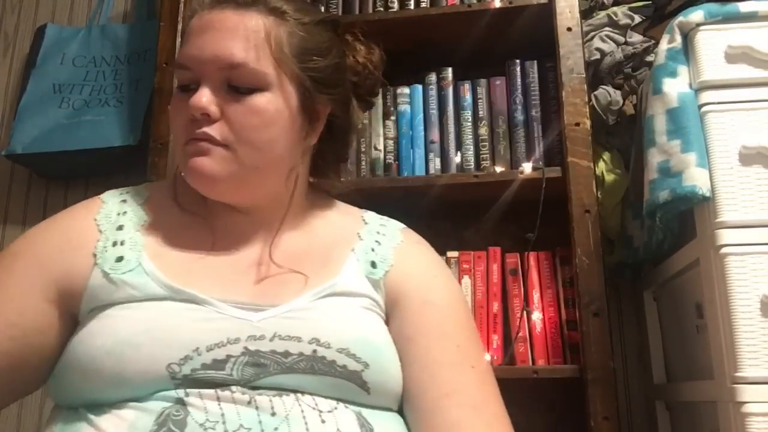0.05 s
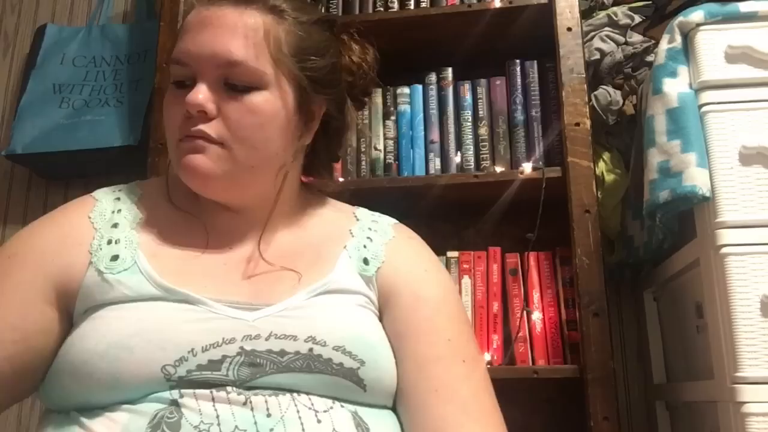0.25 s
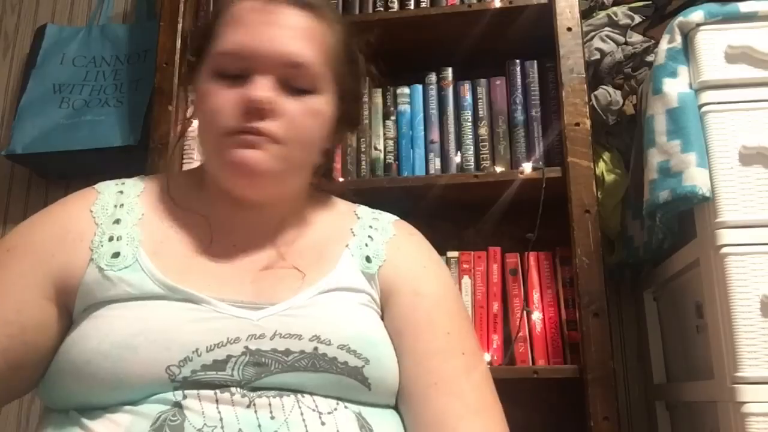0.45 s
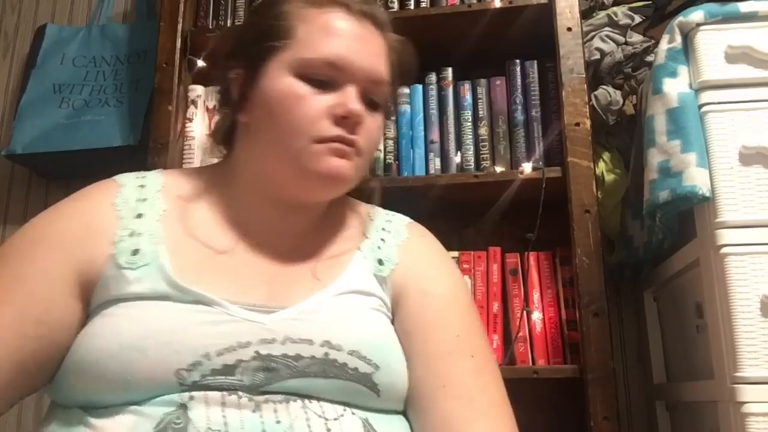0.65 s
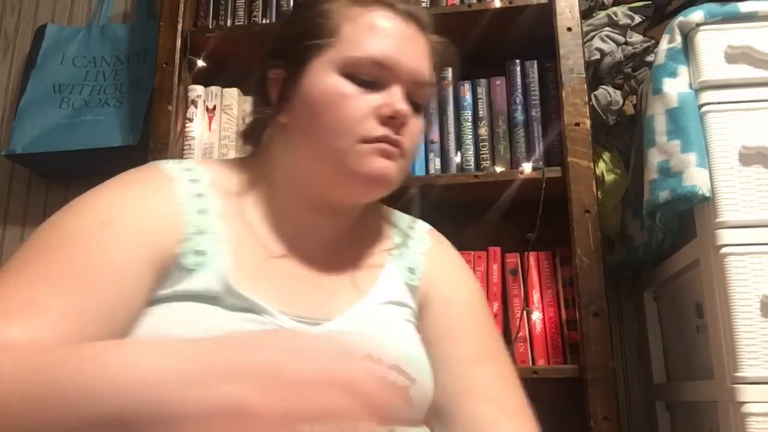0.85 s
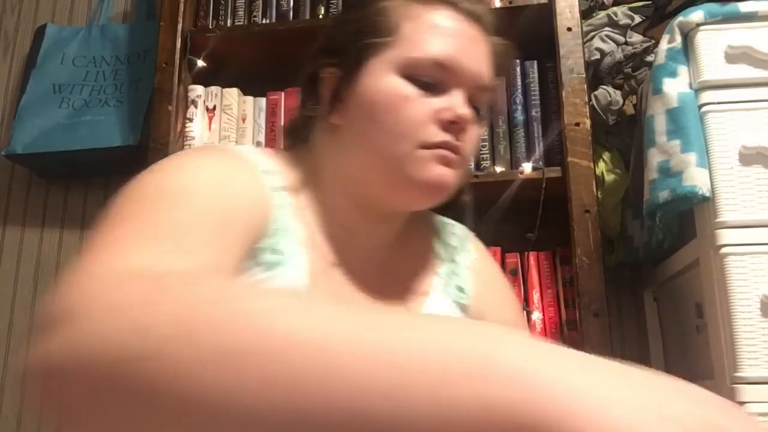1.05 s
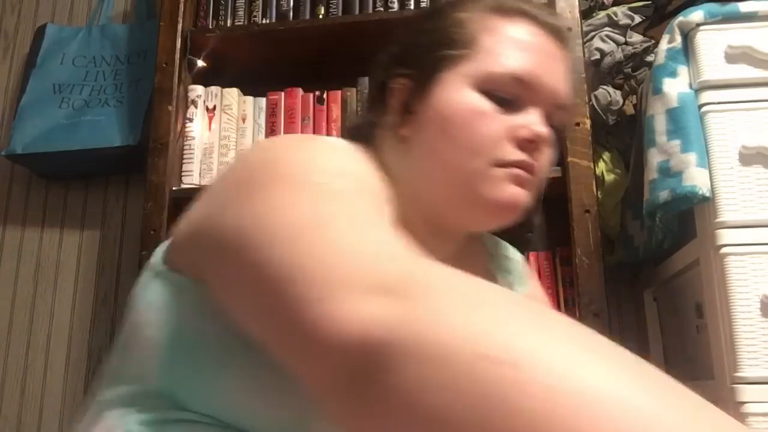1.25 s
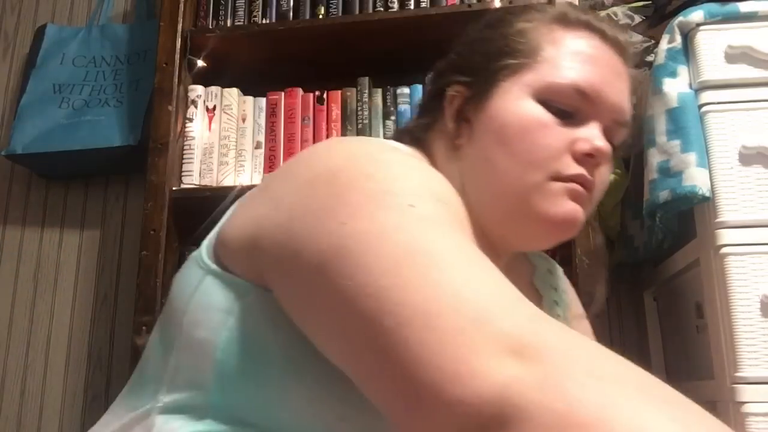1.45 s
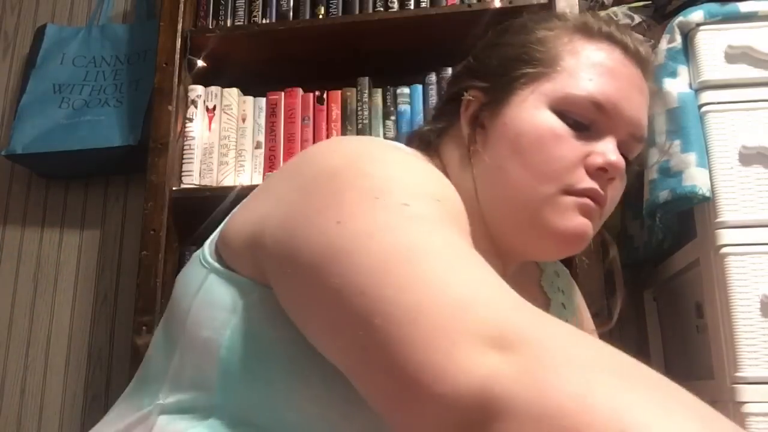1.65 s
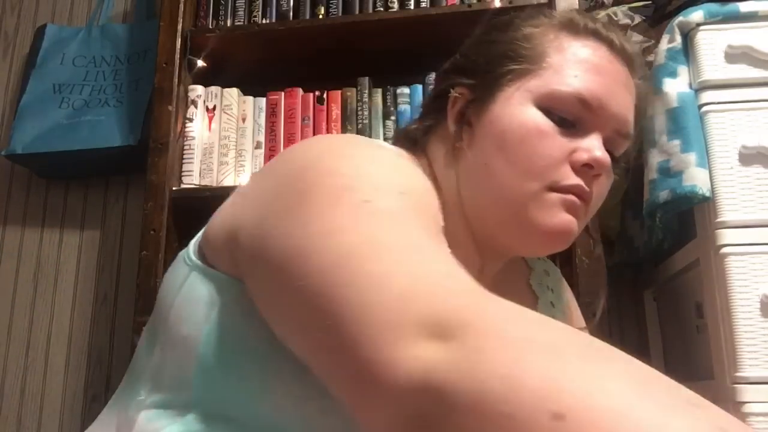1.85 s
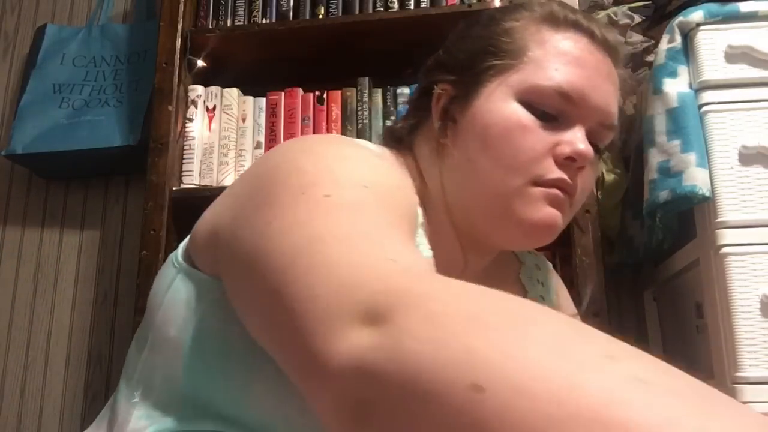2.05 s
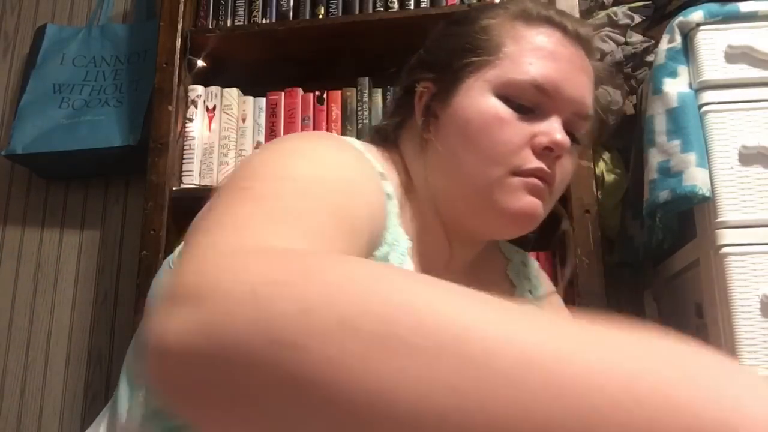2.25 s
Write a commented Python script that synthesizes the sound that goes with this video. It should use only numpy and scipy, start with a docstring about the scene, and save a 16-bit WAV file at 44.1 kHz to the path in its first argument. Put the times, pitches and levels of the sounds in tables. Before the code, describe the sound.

A hard object thumps down on a wooden table, close to the microphone. Clothing swishes faintly, then something slides across the top in two rasping strokes with small knocks and a final shove, in a small, quiet room.

```python
"""Set down and slid on a wooden table

A hard object touches, tips and lands with a boom, close up: its weight rings the table top, its edges knock.
Clothing swishes as an arm reaches across. Something slides over the top in two strokes of hissing,
rasping friction, bumps, knocks and is shoved home. The room is small and quiet, with a faint mains hum."""
import sys
import numpy as np
from scipy import signal
from scipy.fft import rfft, irfft
from scipy.io import wavfile

SR = 44100
rng = np.random.default_rng(int(sys.argv[2]) if len(sys.argv) > 2 else 0)


def bounce(signal):
    """Save signal as a 16-bit WAV file at the path given by the first command-line argument."""
    frames = np.transpose(np.atleast_2d(signal))
    limited = np.clip(frames, -1, 1)
    pcm = np.round(limited * 32767).astype(np.int16)
    wavfile.write(sys.argv[1], SR, pcm)


N = 105840
TIME = np.arange(N) / SR


def from_db(db):
    return 10 ** (np.asarray(db) / 20)


def rms_one(x):
    return x / np.sqrt(np.mean(x ** 2) + 1e-20)


def gains(rows):
    """One fader curve per dB column; a curve that starts late or ends early is silent beyond its rows."""
    times, *columns = np.transpose(rows)
    before_db = -120 if times[0] > .5 else None
    after_db = -120 if times[-1] < TIME[-1] - .05 else None
    return [from_db(np.interp(TIME, times, db, left=before_db, right=after_db)) for db in columns]


def at_hz(points, hz):
    """Reads a curve on a log-frequency axis."""
    freqs, values = np.transpose(points)
    return np.interp(np.log(hz + 1e-9), np.log(freqs), values)


def coloured(x, spectrum):
    """Shapes a steady signal with an EQ curve and brings it to rms 1."""
    eq = from_db(at_hz(spectrum, np.fft.rfftfreq(N, 1 / SR)))
    return rms_one(irfft(rfft(x) * eq, N))


def noise(spectrum):
    return coloured(rng.standard_normal(N), spectrum)


def filtered(x, hz, kind, order=2):
    sos = signal.butter(order, np.clip(hz, 10, .48 * SR), kind, fs=SR, output="sos")
    return signal.sosfilt(sos, x)


def peaked(x, peaks):
    """Adds resonances or notches."""
    for hz, db, q in peaks:
        x = x + (from_db(db) - 1) * signal.lfilter(*signal.iirpeak(hz, q, fs=SR), x)
    return x


def decay(start, t60):
    """Sudden start, exponential fall."""
    return (TIME >= start) * from_db(-60 * np.maximum(TIME - start, 0) / t60)


def ringing(modes):
    """Half a second of struck modes, each a dying sine."""
    t = TIME[:SR // 2]
    return sum(from_db(db - 60 * t / t60) * np.sin(2 * np.pi * hz * t) for hz, db, t60 in modes)


def placed(x, start):
    """Lays a sound on the timeline, `start` seconds in."""
    return np.concatenate([np.zeros(max(int(start * SR), 0)), x, np.zeros(N)])[:N]


def room():
    """Room tone: low rumble, faint hiss and a wavering mains hum."""
    # Each row: frequency in Hz, relative level in dB.
    air_colour = [(20, -25), (55, -1), (100, -16), (200, -15), (500, -21.5), (1500, -25), (4000, -31),
                  (9000, -37), (16000, -43)]
    # Each row of both: time in seconds, level in dB.
    air_level = [(0, -53), (.07, -54.5), (.2, -50), (.45, -53.5), (.7, -54.5), (.78, -55), (.9, -53.5),
                 (2.4, -53)]
    hum_level = [(0, -42.5), (.13, -64), (.3, -38), (.48, -45), (.68, -51), (.78, -64.5), (.86, -47),
                 (1.24, -45), (1.38, -62), (1.55, -41), (1.85, -47), (1.99, -52), (2.22, -48), (2.4, -43.5)]
    hum_hz = 119.6
    hum = np.sqrt(2) * np.sin(2 * np.pi * hum_hz * TIME)
    return gains(air_level)[0] * noise(air_colour) + gains(hum_level)[0] * hum


def thuds():
    """Weight lands on the table top and rings its modes, most of all those near the blow's own pitch."""
    # Each row: frequency in Hz, relative level in dB, time to fall 60 dB in seconds.
    table_modes = [(52.4, -4, 0.44), (77, 5.5, 0.15), (117.3, 8.5, 0.072), (153.4, -6, 0.28),
                   (200, 8.5, 0.081), (232, -5.5, 0.14), (315, -6, 0.14), (411.7, -2.5, 0.049),
                   (486, -1, 0.028), (601, -1, 0.042), (898, -4.5, 0.068)]
    # Each row: start in seconds, level in dB, most excited pitch in Hz.
    blows = [(.002, -37.5, 70.4), (0.018, -41, 318), (0.182, -40, 370), (0.2162, -5.5, 382),
             (.225, -14.5, 142), (0.2486, -7.5, 196), (0.2508, -3, 76), (.397, -30.5, 85),
             (1.336, -44, 71.5), (1.6005, -19.5, 700), (1.605, -23.5, 225), (1.61, -14.5, 410),
             (1.614, -18, 74), (1.675, -21.5, 56), (1.805, -26, 59), (1.86, -28, 454), (2.02, -16.5, 600),
             (2.022, -28, 235), (2.028, -31.5, 76), (2.093, -14, 820), (2.108, -11.5, 119.3),
             (2.177, -24, 123), (2.179, -21, 408), (2.204, -24.5, 49), (2.356, -38.5, 756),
             (2.377, -42, 523)]
    swell_cycles, focus_db_per_octave = 0.37, 18.5
    out, t = np.zeros(N), TIME[:SR // 2]
    for start, db, focus_hz in blows:
        for hz, mode_db, t60 in table_modes:
            level_db = db + mode_db - focus_db_per_octave * abs(np.log2(hz / focus_hz))
            swell = 1 - np.exp(-(t * hz / swell_cycles) ** 2)  # low modes bloom more slowly
            out += placed(swell * ringing([(hz, level_db, t60)]), start)
    return out


def friction(spectrum):
    """Surface grains catch and let go thousands of times a second, under a juddering pressure."""
    grains_per_s, grain_spread_db = 9000, 1.5
    judder_hz, judder_db = 200, 1.15
    caught = rng.random(N) < grains_per_s / SR
    sizes = from_db(grain_spread_db * np.minimum(rng.exponential(1, N), 4))
    grains = caught * sizes * rng.choice([-1, 1], N)
    judder = rms_one(filtered(rng.standard_normal(N), judder_hz, "low"))
    return coloured(grains, spectrum) * from_db(judder_db * judder)


def clothes():
    """Cloth rubs in soft swishes that swell and fade with the arm's speed."""
    # Each row: start, peak and end in seconds, level in dB, low-pass in Hz.
    # The first swish cuts off just short of its peak.
    swishes = [(0.094, 0.178, 0.17, -52.5, 9000), (0.807, 0.908, 1.1, -51.5, 16000),
               (0.857, 1.058, 1.41, -52, 9000)]
    # Each row: frequency in Hz, relative level in dB.
    cloth_colour = [(200, -15), (800, -10), (2000, -5.5), (3600, -4), (7000, -8), (10000, -10.5),
                    (16000, -10.5)]
    rubbing, out = friction(cloth_colour), np.zeros(N)
    for start, peak, end, db, dull_hz in swishes:
        speed = np.interp(TIME, [start, peak, end], [0, 1, 0])
        out += from_db(db) * speed * filtered(rubbing, dull_hz, "low")
    return out


def knocks():
    """Hard edges meet with a short crunch and a ping; then object and room ring, dying band by band."""
    # Each row: start in seconds, level in dB, low-pass in Hz, contact length in seconds,
    # relative ring level in dB, ping pitch in Hz, relative ping level in dB.
    hits = [(0.212, -35.5, 8900, .003, -2, 3400, -7), (0.2262, -19.5, 1890, 0.0055, -11, 1690, -19),
            (0.2462, -8.5, 8700, 0.00448, -8.5, 2110, -5), (0.2597, -22, 13000, 0.0048, -15, 1400, -8),
            (1.5992, -29.5, 9100, 0.012, -21, 1140, 3.5), (2.006, -33, 1980, 0.0069, -2.5, 946, 9),
            (2.02, -22, 5000, 0.0071, -13.5, 6370, -2), (2.0904, -19.5, 10800, .004, -11, 4100, 1),
            (2.375, -43, 2460, 0.0073, -12, 970, 4.5), (2.389, -37, 3020, 0.0047, -22, 1960, 0)]
    # Tone of the crunch and its noisy tail. Each row: frequency in Hz, relative level in dB.
    knock_colour = [(100, -6), (300, 12.5), (900, 3), (2400, 2.5), (2900, -3), (4200, -3), (6000, -4),
                    (9000, -10.5), (16000, -11)]
    # Each row: frequency in Hz, time for the tail to fall 60 dB in seconds.
    tail_t60 = [(200, 0.12), (1000, 0.17), (4000, 0.17), (14000, 0.12)]
    # Each row: frequency in Hz, relative level in dB, time to fall 60 dB in seconds.
    object_modes = [(654, -7, 0.12), (954, -14, .22), (1079, -8.5, 0.14), (1405, -9.5, 0.081),
                    (1545, -11.5, 0.2), (1718, -4, 0.1), (2062, -14.5, 0.22), (2355, -19, 0.18),
                    (2520, -9, 0.166), (3365, -14, .13)]
    ring_delay_s, ping_t60_s = 0.00136, 0.024
    crunch, wash, out = noise(knock_colour), noise(knock_colour), np.zeros(N)
    edges_hz = np.geomspace(120, 17000, 8)
    bands = [(filtered(wash, [lo, hi], "band"), at_hz(tail_t60, np.sqrt(lo * hi)))
             for lo, hi in zip(edges_hz, edges_hz[1:])]
    for start, db, dull_hz, length, ring_db, ping_hz, ping_db in hits:
        contact = crunch * np.exp(-((TIME - start - length / 2) / (length / 2)) ** 4)
        ring_start = start + ring_delay_s
        # Alternating polarity keeps neighbouring bands from cancelling where they meet.
        tail = sum((-1) ** k * band * decay(ring_start, t60) for k, (band, t60) in enumerate(bands))
        ring = tail + placed(ringing(object_modes), ring_start)
        body = filtered(contact + from_db(ring_db) * ring + 1e-18, dull_hz, "low")
        ping = placed(ringing([(ping_hz, ping_db, ping_t60_s)]), start + length / 4)
        out += from_db(db) * (body + ping)
    return out


def tick():
    """A tiny bright click, like a nail touching an edge."""
    treble = filtered(rng.standard_normal(N), hz=8300, kind="high")
    return from_db(-27.5) * treble * decay(start=1.2268, t60=0.008)


def stroke(levels, body):
    """One slide over the wood: light, fast rubbing hisses, and pressure adds a rasp."""
    # Each row of both: frequency in Hz, relative level in dB.
    hiss_colour = [(200, -13), (420, -7), (650, -5.5), (2000, -6), (4000, -1), (6500, -1.5), (9200, 0.5),
                   (12000, -5.5), (16000, -13)]
    rasp_colour = [(100, 2.5), (350, -2.5), (850, -1.5), (1400, -0.5), (2400, -2), (4000, -8), (7000, -10),
                   (16000, -44)]
    hiss_gain, rasp_gain = gains(levels)
    return peaked(hiss_gain * friction(hiss_colour) + rasp_gain * friction(rasp_colour), body)


def sliding():
    """Friction across the table top: two strokes and a last, coarser shove."""
    # Each row of both: time in seconds, hiss level in dB, rasp level in dB.
    first_stroke = [(1.329, -69, -61), (1.338, -37.5, -58), (1.375, -34, -55.5), (1.46, -33.5, -41.5),
                    (1.505, -38, -34.5), (1.545, -41.5, -37), (1.585, -59, -49.5), (1.63, -71, -65)]
    second_stroke = [(1.61, -60, -45), (1.675, -42, -41), (1.76, -36, -38.5), (1.83, -38.5, -41.5),
                     (1.99, -37.5, -49.5), (2.05, -41.5, -46), (2.12, -51.5, -41.5), (2.2, -40.5, -52),
                     (2.215, -73, -75)]
    # The hollow body of each stroke. Each row: frequency in Hz, boost or cut in dB, Q.
    first_body = [(1230, 2, 6), (1680, -6, 10), (2000, 2, 3.4), (3010, 3.5, 14), (4200, 1.5, 20),
                  (5660, 1, 18)]
    second_body = [(584, 6.5, 5), (1350, 1.5, 8.2), (1770, 2.7, 16), (2920, 1.7, 4.7), (6800, 3, 21)]
    # Each row: time in seconds, level in dB.
    shove_level = [(2.1, -43), (2.125, -34.5), (2.147, -26), (2.17, -29.5), (2.195, -31), (2.212, -41.5),
                   (2.25, -43.5), (2.3, -67)]
    # Each row: frequency in Hz, relative level in dB.
    shove_colour = [(100, -6), (300, -3), (650, -4), (1000, -3.5), (3000, -5.5), (6000, -9.5),
                    (8000, -17.5), (16000, -31)]
    strokes = stroke(first_stroke, first_body) + stroke(second_stroke, second_body)
    return strokes + gains(shove_level)[0] * friction(shove_colour)


def hollow_tone():
    """Friction keeps a narrow resonance ringing; it rises as the first stroke speeds up."""
    # Each row: time in seconds, pitch in Hz, level in dB.
    glide = [(1.33, 600, -60), (1.339, 612.4, -49.5), (1.42, 677, -50.5), (1.47, 833, -46.5),
             (1.5, 863, -36), (1.55, 879, -48), (1.585, 890, -66)]
    half_width_hz = 61
    times, hz, db = np.transpose(glide)
    flutter_cos, flutter_sin = filtered(rng.standard_normal((2, N)), half_width_hz, "low")
    phase = 2 * np.pi * np.cumsum(np.interp(TIME, times, hz)) / SR
    breathy_tone = rms_one(flutter_cos * np.cos(phase) + flutter_sin * np.sin(phase))
    return gains(np.transpose([times, db]))[0] * breathy_tone


def reflected(x):
    """Surfaces beside the microphone add faint, slightly delayed copies."""
    # Each row: delay in seconds, relative level in dB.
    reflections = [(.00072, -25.5), (.00092, -23)]
    return x + sum(from_db(db) * placed(x, delay) for delay, db in reflections)


def scene():
    """The mono mix; knocks, tick, sliding and cloth pick up the close reflections."""
    handling = knocks() + tick() + sliding() + clothes()
    return (thuds() + reflected(handling) + room() + hollow_tone())[None]


def record(dry):
    """The microphone drops the deepest bass, colours the treble, rounds loud peaks and cuts the top."""
    # Each row: frequency in Hz, boost or cut in dB, Q.
    mic_colour = [(3890, 2, 20), (4850, -4.5, 15), (7420, -4.5, 14), (10450, -6.5, 12.7)]
    low_cut_hz, high_cut_hz, ceiling = 44.5, 15800, 1.15
    x = peaked(filtered(dry, low_cut_hz, "high", order=4), mic_colour)
    x = x / (1 + (x / ceiling) ** 6) ** (1 / 6)  # soft clip
    return signal.sosfilt(signal.ellip(10, .1, 70, high_cut_hz, fs=SR, output="sos"), x)


dry = scene()
out = record(dry)
bounce(out)
```